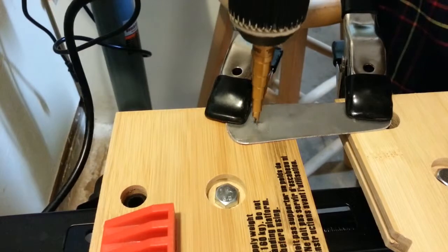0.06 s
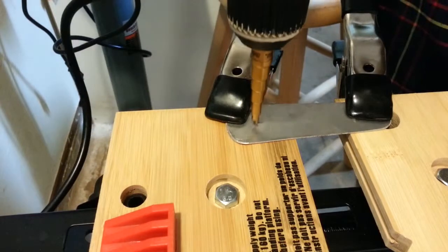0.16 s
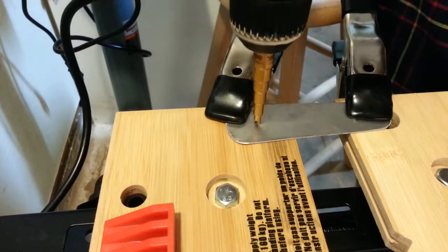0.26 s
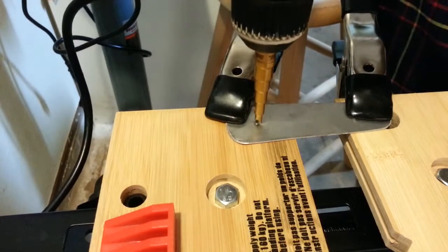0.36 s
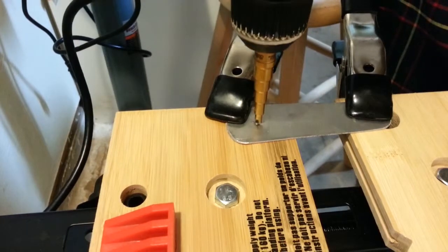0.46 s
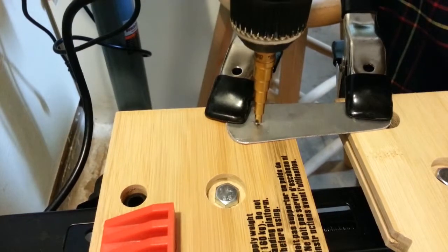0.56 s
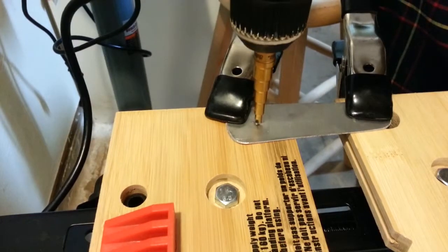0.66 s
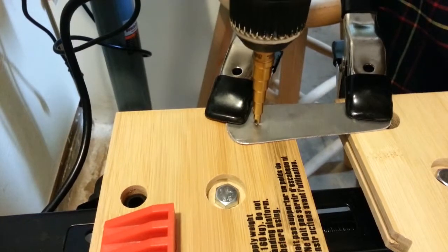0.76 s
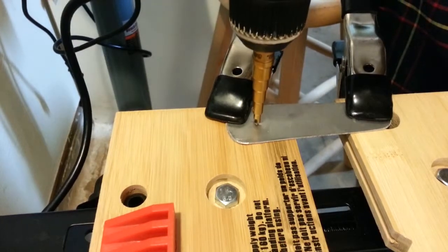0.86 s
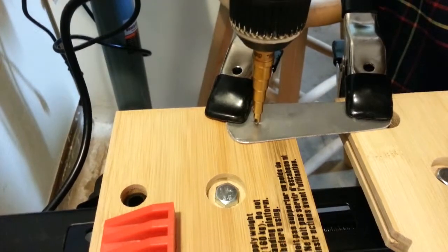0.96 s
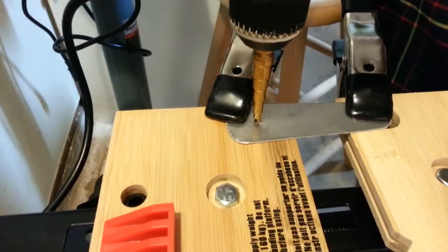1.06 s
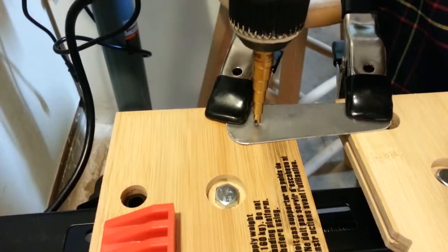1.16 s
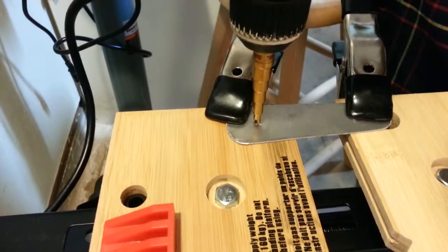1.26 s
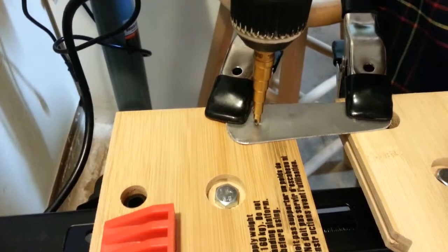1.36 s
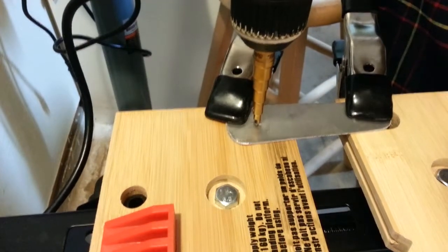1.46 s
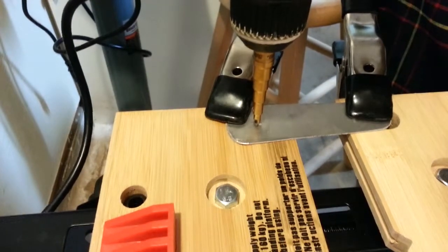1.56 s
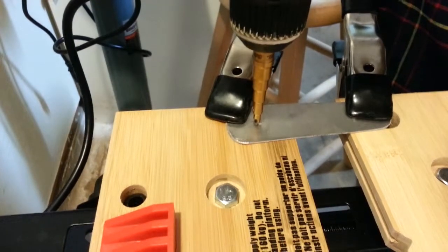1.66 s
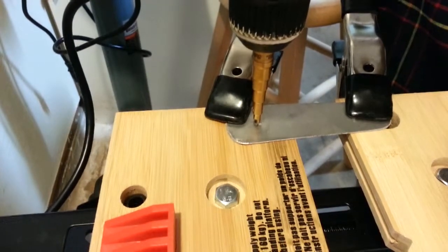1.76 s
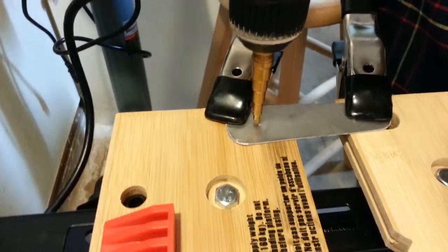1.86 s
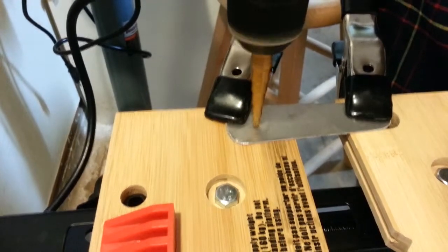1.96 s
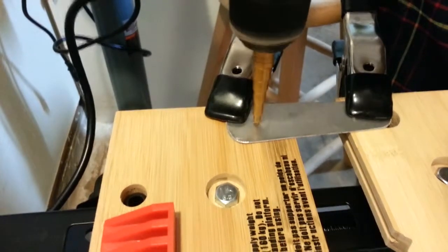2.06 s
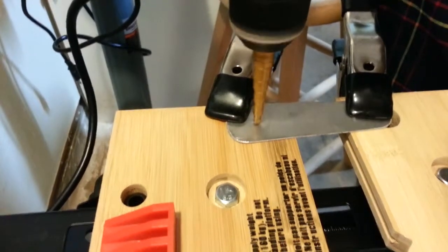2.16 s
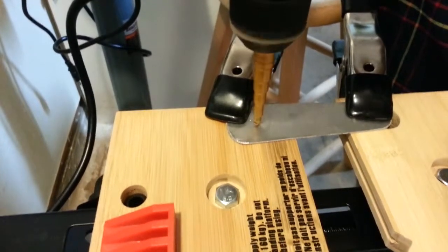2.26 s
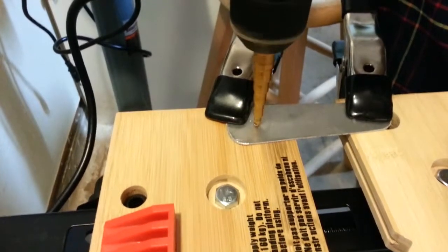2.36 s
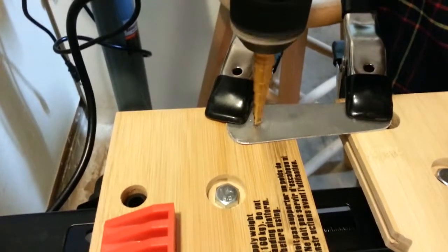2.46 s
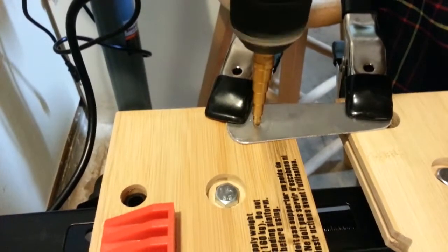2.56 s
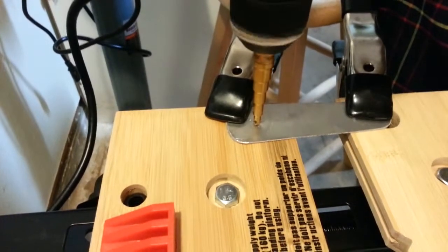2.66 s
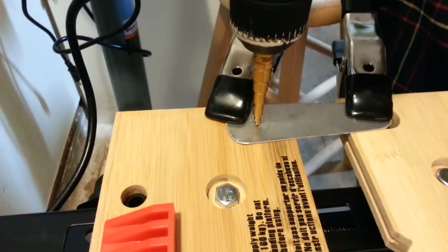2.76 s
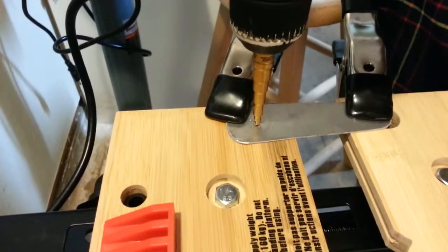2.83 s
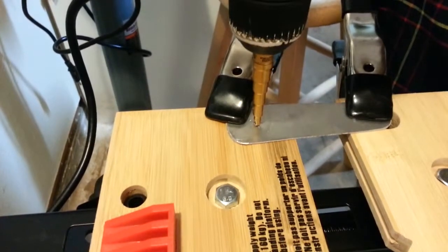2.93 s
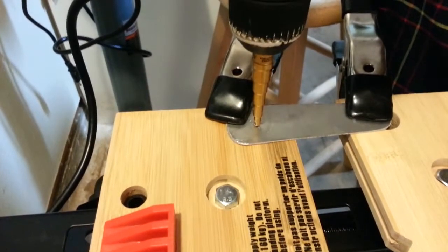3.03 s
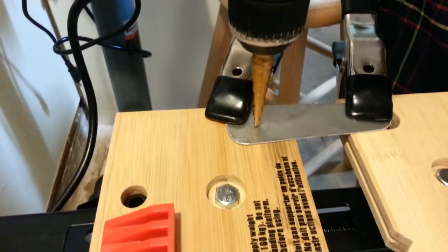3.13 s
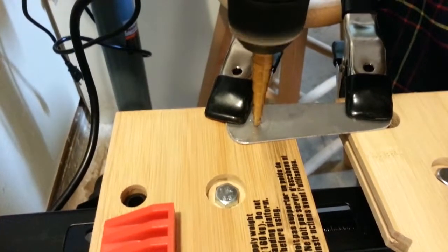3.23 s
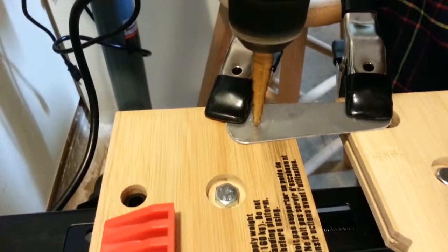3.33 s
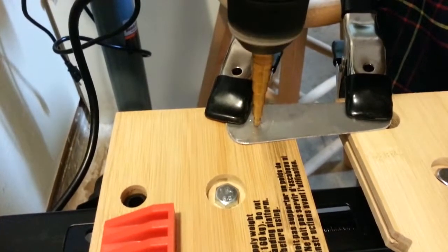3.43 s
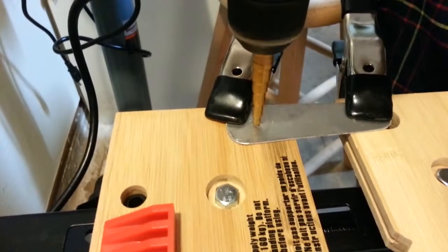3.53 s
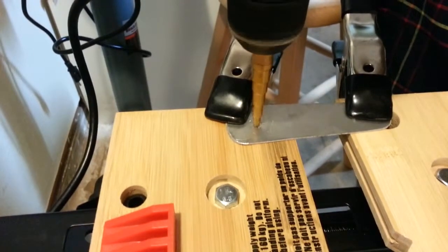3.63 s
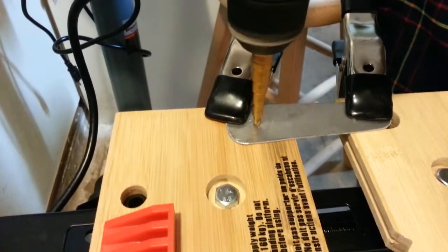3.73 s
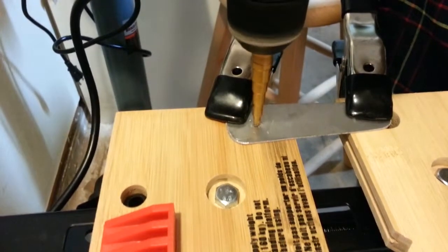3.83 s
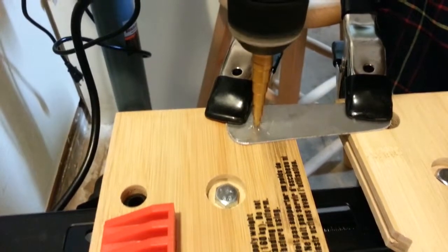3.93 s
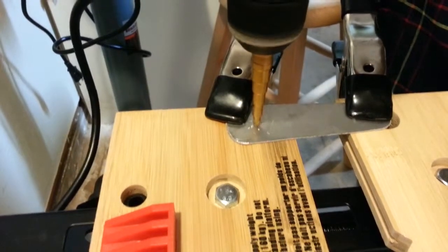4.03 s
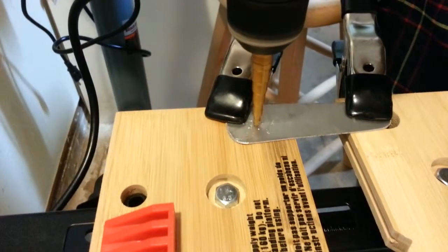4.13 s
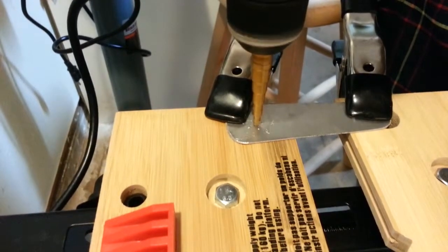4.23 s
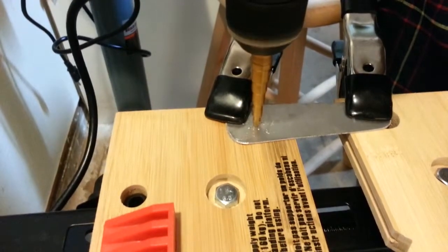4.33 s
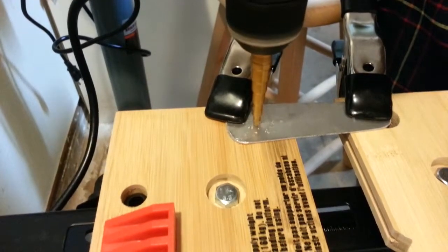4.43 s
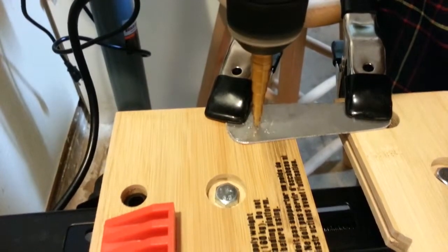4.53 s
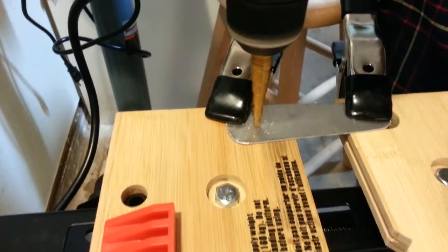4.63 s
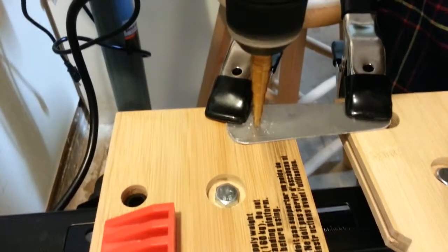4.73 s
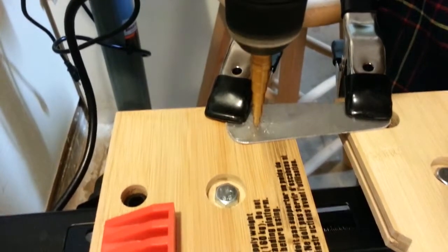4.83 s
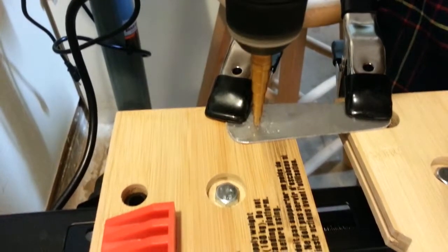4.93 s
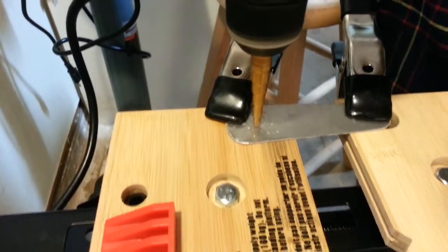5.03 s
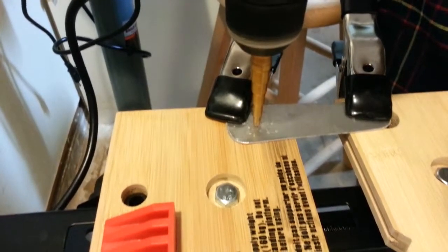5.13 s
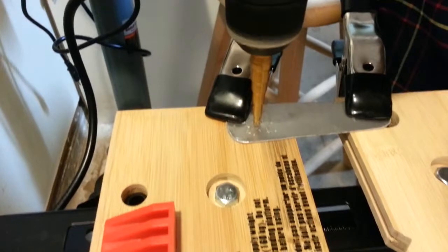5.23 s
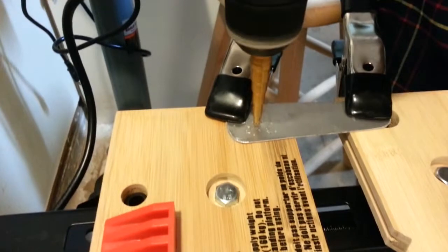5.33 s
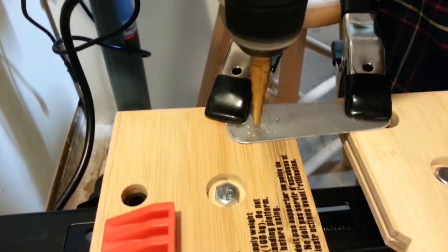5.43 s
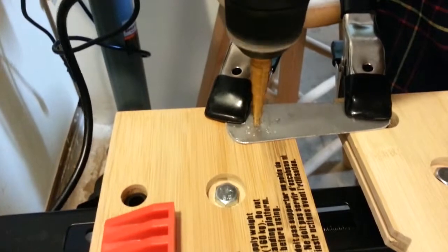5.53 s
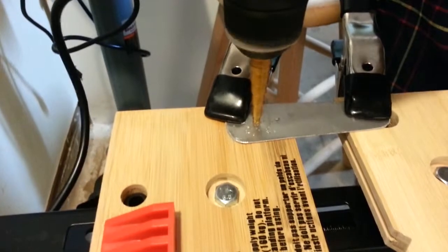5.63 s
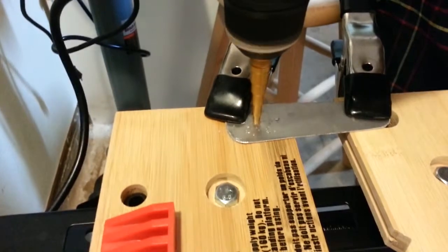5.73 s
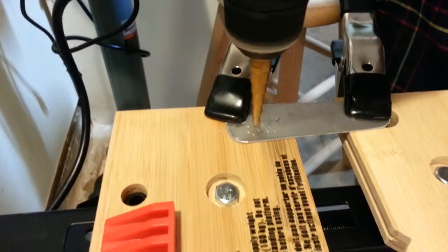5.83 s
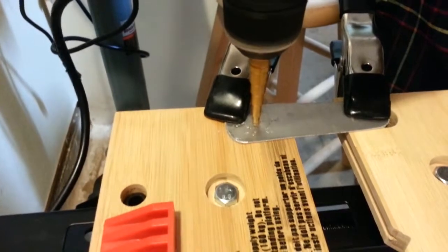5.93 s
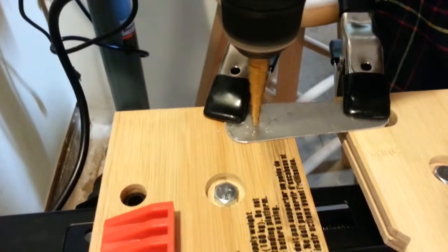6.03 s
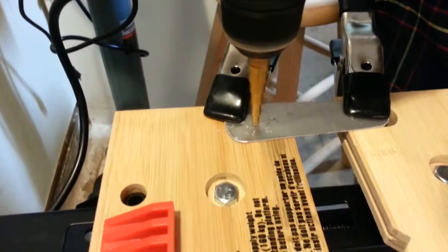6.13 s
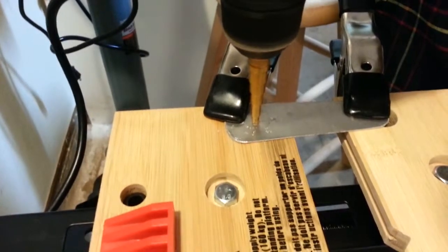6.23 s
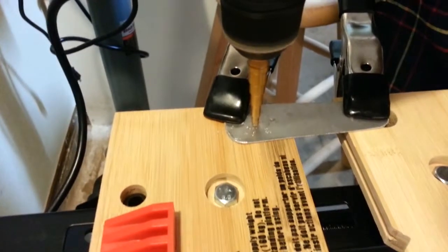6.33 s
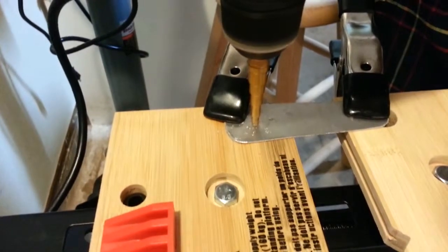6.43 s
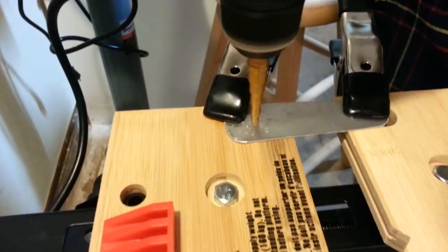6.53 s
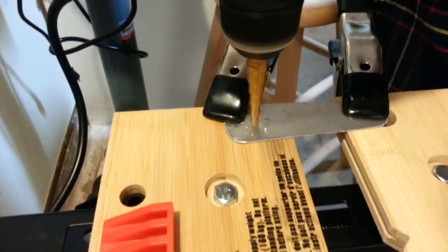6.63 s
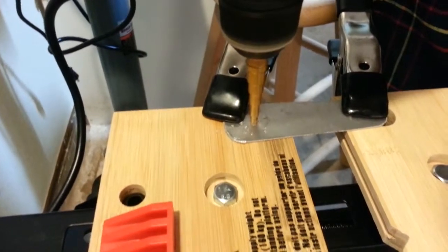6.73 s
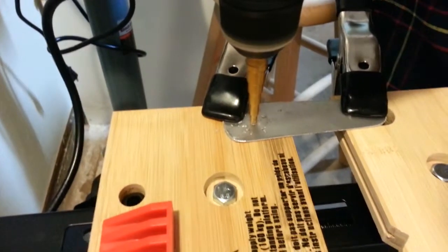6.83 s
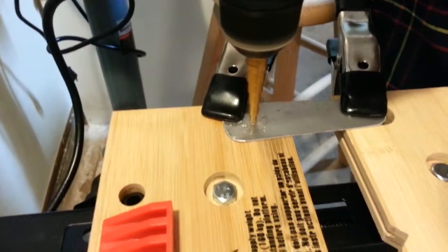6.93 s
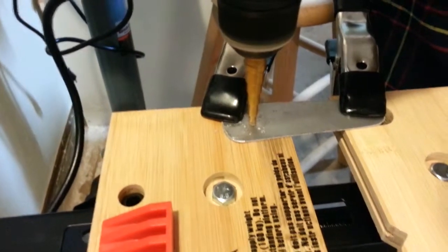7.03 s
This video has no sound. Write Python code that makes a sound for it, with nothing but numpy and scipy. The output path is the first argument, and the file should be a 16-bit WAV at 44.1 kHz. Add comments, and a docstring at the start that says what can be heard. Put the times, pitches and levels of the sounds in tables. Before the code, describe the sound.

For nearly two seconds there is only a low, soft room rumble and a faint hollow tone around 500 Hz that fades out, with tiny clicks at 0.5 and 1.4 and a clearer knock at 1.8. At 1.96 a mains drill on a clamped metal plate kicks in for a tenth of a second, with a rough gear grind and a buzzing, high squeal, then coasts down, whirring and ticking, to a stop by about 2.8. Soft rubs and knocks of the tool come around 2.9 to 3.2. Further short pulls start at 3.2, 3.8, 4.4, 4.9 and 5.8, each rising sharply and sagging before the next. A longer pull at 6.35 climbs highest, and another at 6.9 stays fast and loud to the end. Brush hiss, thin whistles and short room echo accompany it; low fan gusts buffet the right microphone.

```python
"""A drill grinds and squeals in short runs, each one winding up and then sinking as it coasts.
It is a mains drill with a step bit on a clamped metal plate; one shaft speed drives all its parts.
Gears and bit are noise shaped by the housing, brushes are ticks and hiss, the armature squeals in 120 Hz bursts.
Low, lumpy fan air buffets the right microphone port; knocks and rubs of the tool surround the runs.
Behind it lie a short room echo, a low rumble and a faint hollow tone that fades."""
import sys
import numpy as np
from scipy import signal
from scipy.fft import rfft, irfft, next_fast_len
from scipy.io import wavfile
from scipy.ndimage import uniform_filter1d, minimum_filter1d, map_coordinates

SR = 44100
rng = np.random.default_rng(int(sys.argv[2]) if len(sys.argv) > 2 else 0)


def unload_audio(sound):
    """Save the sound as a 16-bit wav file, at the path given as the first command line argument."""
    columns = np.transpose(np.atleast_2d(sound))
    # keep every value between -1 and 1, then stretch to whole-number steps
    steps = np.round(np.clip(columns, -1, 1) * 32767)
    wavfile.write(sys.argv[1], SR, steps.astype(np.int16))


N = 312669
SLOTS = 12  # armature slots, and as many commutator bars


def amp(db):
    """Decibels to gain."""
    return 10 ** (np.asarray(db) / 20)


def unit(x):
    """x at rms 1."""
    return x / np.sqrt(np.mean(x ** 2) + 1e-20)


def along(points, hz):
    """Read (frequency [Hz], value) points on a log frequency axis."""
    f, v = np.transpose(points)
    return np.interp(np.log(hz + 1), np.log(f + 1), v)


def curves(rows):
    """One value per sample for each column after the time."""
    times, *columns = np.transpose(rows)
    return [np.interp(np.arange(N) / SR, times, column) for column in columns]


def wobble(rate):
    """A smooth random curve, rate knots a second."""
    knots = rng.standard_normal(int(N * rate / SR) + 4)
    return map_coordinates(knots, [np.arange(N) * rate / SR])


def filtered(x, response):
    """x times a complex response of frequency."""
    m = next_fast_len(N + SR // 2)
    return irfft(rfft(x, m) * response(np.fft.rfftfreq(m, 1 / SR)), m)[..., :N]


def coloured(x, spectrum):
    """x through a (frequency [Hz], level [dB]) spectrum."""
    return filtered(x, lambda hz: amp(along(spectrum, hz)))


def ring(modes, hz):
    """Summed response of damped resonances, each a band-pass at its own centre."""
    return sum(amp(db) * 1j * hz * width / (centre ** 2 - hz ** 2 + 1j * hz * width)
               for centre, width, db in modes)


# Likeness of the two ports: (frequency [Hz], correlation [-1 to 1])
PORT_LIKENESS = [(200, 0.78), (1000, 0.78), (3000, 0.38), (5000, 0.067), (9000, 0.077), (14000, .2)]


def noise_pair():
    """White noise as a shared middle and an opposed side, so the ports are alike by set amounts."""
    def middle_and_side(hz):
        angle = np.arccos(np.clip(along(PORT_LIKENESS, hz), -1, 1)) / 2
        return np.array([np.cos(angle), np.sin(angle)])

    mid, side = filtered(rng.standard_normal((2, N)), middle_and_side)
    return np.array([mid + side, mid - side])


def pulses(phase, size):
    """A band-limited pulse wherever phase passes a whole number, placed between samples."""
    at = np.interp(np.arange(1, int(phase[-1])), phase, np.arange(N))
    taps = at.astype(int)[:, None] + np.arange(-7, 9)
    gap = taps - at[:, None]
    shape = np.sinc(gap) * np.cos(np.pi * gap / 16) ** 2
    heights = shape * size(len(at))[:, None]
    return np.bincount(np.clip(taps, 0, N - 1).ravel(), heights.ravel(), N)


def speed_gain(speed, level_db, knee, slope_db):
    """A part grows by slope_db per tenfold speed up to the knee [turns/s], then levels off."""
    share = (speed / knee) / (1 + (speed / knee) ** 6) ** (1 / 6)
    return amp(level_db + slope_db * np.log10(share + 1e-6))


# Pulls of the trigger: (press time [s], release time [s], shaft speed at release [turns/s])
TRIGGER_PULLS = [(1.959, 2.056, 220.4), (3.228, 3.307, 223.4), (3.838, 3.952, 296), (4.413, 4.55, 293.2),
                 (4.922, 5.082, 313.5), (5.831, 5.971, 305.8), (6.361, 6.665, 367), (6.912, 7.1, 365.4)]


def shaft():
    """Shaft speed [turns/s] and power: spin-up slows as it climbs, then friction and drag run it down."""
    surge = 0.043  # s after which the acceleration has halved
    friction, drag = 230, 0.52  # turns/s lost each second; rate of loss per unit of speed [1/s]
    t, speed, power = np.arange(N) / SR, np.zeros(N), np.zeros(N)
    for press, release, top in TRIGGER_PULLS:
        start = speed[round(press * SR)]
        held, after = (t >= press) & (t < release), t >= release
        rise = np.log1p((t[held] - press) / surge) / np.log1p((release - press) / surge)
        speed[held] = start + (top - start) * rise
        power[held] = 1
        coast = (top + friction / drag) * np.exp(-drag * (t[after] - release)) - friction / drag
        speed[after] = np.maximum(coast, 0)
    return speed, uniform_filter1d(power, size=300)


# Colour of the scraping, before the housing: (frequency [Hz], relative level [dB])
GRIND_SPECTRUM = [(40, -30), (130, -2), (260, -13), (450, -0.5), (800, -2.5), (1200, -3.5), (2200, -2.5),
                  (2900, -2), (3600, -6), (5200, -5.5), (6000, -15.5), (9000, -16), (15000, -37)]
# Resonances of the gear housing: (frequency [Hz], width [Hz], relative level [dB])
HOUSING_MODES = [(970, 150, 5.5), (1480, 150, 2), (1760, 150, 3), (3560, 300, -2), (4650, 400, -7)]


def grind(turns, rattle=0.083, grain_db=2):
    """Gear teeth and cutting edges scrape in step with the shaft and sound the housing."""
    once_a_turn = 1 + rattle * np.cos(2 * np.pi * turns)
    grain = amp(grain_db * wobble(500) + 0.9 * wobble(30))
    scrape = noise_pair() * once_a_turn * grain
    return unit(filtered(
        scrape, lambda hz: amp(along(GRIND_SPECTRUM, hz)) * (1 + ring(HOUSING_MODES, hz))))


# Magnetic pull on the slots: (frequency [Hz], relative level [dB])
PULL_SPECTRUM = [(500, -35), (2000, -28), (2600, -2.5), (3100, 1), (3600, 3.5), (4200, -11), (5200, 1.5),
                 (6300, -39), (12000, -28.5)]
# Ring of the stator: (frequency [Hz], width [Hz], relative level [dB])
STATOR_MODES = [(3020, 130, 3)]


def squeal(turns, speed, power, db=-23, ring_db=3, second_db=-5, flutter_db=2):
    """Under power the field tugs at the slots on every half wave of the mains and rings the stator."""
    mains_hz = 60
    t = np.arange(N) / SR
    current = power / (1 + (speed / 300) ** 6)  # back voltage cuts the current at speed
    bursts = 0.15 + 2.1 * np.abs(np.sin(2 * np.pi * mains_hz * t)) ** 3
    slot = 2 * np.pi * SLOTS * turns
    tug = np.sin(slot) + amp(second_db) * np.sin(2 * slot)
    tug *= 1 + 0.21 * np.cos(2 * np.pi * turns)
    flutter = amp(flutter_db * wobble(110))
    force = np.minimum(1, speed / 135) ** 3 * current * bursts * tug * flutter
    return amp(db) * filtered(
        force, lambda hz: amp(along(PULL_SPECTRUM, hz)) * (0.72 + amp(ring_db) * ring(STATOR_MODES, hz)))


# Colour of the brush ticks: (frequency [Hz], relative level [dB])
TICK_SPECTRUM = [(300, -30), (1500, -16), (2400, -6), (3200, 2), (4800, 2), (6100, -5), (7200, -2),
                 (10000, -8), (14500, -17)]


def brushes(turns, speed):
    """Brushes tick on every bar; bars out of true swell and sway the ticks once a turn."""
    uneven, sway = 0.3, 0.042  # share of the tick size; bars
    wear, rough = 0.2, 0.2  # scatter from bar to bar; from tick to tick
    bars = SLOTS * turns + sway * np.sin(2 * np.pi * turns)

    def size(count):
        once_a_turn = 1 + uneven * np.cos(2 * np.pi * np.arange(count) / SLOTS + np.pi / 2)
        worn = np.resize(wear * unit(rng.standard_normal(SLOTS)), count)
        return (once_a_turn + worn) * (1 + rough * rng.standard_normal(count))

    ticks = pulses(bars, size) / np.sqrt(speed + 20)  # evens out the power as ticks crowd together
    return unit(coloured(ticks, TICK_SPECTRUM))


# Colour of the brush hiss: (frequency [Hz], relative level [dB])
HISS_SPECTRUM = [(1500, -13.5), (3200, 1), (5000, 2), (6100, -2.5), (7300, -3), (9000, -7), (11000, -8),
                 (14000, -13.5)]
# Brush holders, rung by rubbing at a crawl: (frequency [Hz], width [Hz], relative level [dB])
HOLDER_MODES = [(3220, 630, 0)]


def commutator(turns, speed):
    """Ticks are clearest at middling speed; a crawl rubs the holders and full speed blurs into hiss."""
    clear = 0.82 / (1 + (speed / 178) ** 4) * np.minimum(1, speed / 55) ** 2
    hiss = unit(coloured(noise_pair() * amp(0.5 * wobble(760)), HISS_SPECTRUM))
    rubbing = unit(filtered(noise_pair(), lambda hz: ring(HOLDER_MODES, hz)))
    crawl = amp(15) / (1 + (speed / 56) ** 4)  # fades above 56 turns/s
    ticks = brushes(turns, speed)
    return amp(7.5) * np.sqrt(1 - clear) * hiss + amp(5.5) * np.sqrt(clear) * ticks + crawl * rubbing


# Whistles of slots and fan blades: (multiple of the shaft speed, relative level [dB])
WHISTLE_ORDERS = [(11, -6), (12, 0), (13, 2), (14, -10), (22, -4), (23, 1), (24, -2), (25, -2), (47, 0),
                  (48, 2), (49, 2), (50, -1), (72, 0), (73, 1)]
# The vents that let them out: (frequency [Hz], relative level [dB])
VENT_SPECTRUM = [(1500, -24), (2900, -10), (3600, -1), (4300, 1), (5100, 0), (5700, -12), (7000, -13),
                 (9000, -24), (13000, -40)]


def whine(turns, speed):
    """Slots and fan blades whistle on neighbouring orders, each wavering; they die away at low speed."""
    tone = np.zeros(N)
    for order, db in WHISTLE_ORDERS:
        phase = 2 * np.pi * order * turns + 0.35 * wobble(70)
        tone += amp(db + 2 * wobble(45)) * np.sin(phase)
    return amp(-35.5) * coloured(np.minimum(1, speed / 155) ** 3 * tone, VENT_SPECTRUM)


# Slow rise and fall in level of the grinding and brush noise:
# (time [s], grind offset [dB], brush offset [dB])
LEVEL_DRIFT = [(2.08, 2, 0), (2.25, -3, -3), (2.4, -1, 0), (2.56, -4.5, -1.5), (2.75, 1.5, -4.5),
               (3.3, 0, -2), (3.5, 1.5, 0.5), (3.66, -3, -1), (3.82, -0.5, -3), (3.95, 1, 0.5),
               (4.08, -0.5, -2.5), (4.4, 1, -1.5), (5.05, 0.5, -1), (5.4, 1, -1), (5.8, 1, -0.5),
               (6.25, 2, 0), (6.5, 1, -0.5), (7.0, 1.5, 1.5)]


def drill(speed, power):
    """All parts of the tool follow one shaft; power and the jolt of a start shift gears and brushes."""
    turns = np.cumsum(speed * (1 + 0.00207 * wobble(40))) / SR
    jolt = power * np.exp(-speed / 110)  # strongest when starting from rest
    skim = 11 * np.log2(np.maximum(1, speed / 215))  # brushes skim: dB lost above 215 turns/s
    grind_drift, brush_drift = curves(LEVEL_DRIFT)
    grind_db = grind_drift + 0.5 * power + 11 * jolt + 0.47 * wobble(15)
    brush_db = brush_drift + 3.5 * power - 4 * jolt - skim
    grind_gain = speed_gain(speed, level_db=-31, knee=241, slope_db=22.4) * amp(grind_db)
    brush_gain = speed_gain(speed, level_db=-40.5, knee=140, slope_db=26) * amp(brush_db)
    gears_and_bit = grind_gain * grind(turns)
    brush_noise = brush_gain * commutator(turns, speed)
    return gears_and_bit + brush_noise + squeal(turns, speed, power) + whine(turns, speed)


# Colour of the tumbling air: (frequency [Hz], relative level [dB])
EDDY_SPECTRUM = [(10, -64), (32, -49), (62, -14), (120, -6.5), (220, 1.5), (450, -1.5), (800, -9),
                 (1400, -18), (3000, -41)]
# Slow swells and lulls of the fan air: (time [s], level offset [dB])
AIR_GUSTS = [(2.15, -0.5), (2.45, -0.5), (3.25, -1.5), (3.5, 4), (3.66, -4), (4.05, -1), (4.35, -0.5),
             (4.55, 0.5), (4.85, -1), (4.97, -3), (5.2, 1.5), (5.5, -5.5), (5.62, -0.5), (6.0, -2.5),
             (6.3, -5.5), (6.5, 0.5), (6.9, -1.5), (7.08, 5.5)]
# Timed eddies at the right port: (time [s], relative level [dB])
TIMED_EDDIES = [(2.108, -22.5), (2.131, -32), (2.147, -24), (2.184, -28), (2.29, -28.5), (2.349, -28.5),
                (2.539, -46.5), (3.373, -35), (3.514, -27.5), (3.98, -25), (4.037, -19), (4.077, -29),
                (4.156, -22.5), (4.214, -28), (4.533, -26), (4.551, -19), (4.604, -25), (4.761, -24),
                (4.843, -29.5), (5.027, -22), (5.118, -22), (5.167, -22), (5.232, -24), (5.322, -24),
                (5.486, -21), (5.971, -25), (6.026, -25.5), (6.542, -29.5), (6.589, -22), (6.697, -24.5),
                (6.948, -23.5), (7.031, -31), (7.059, -23.5)]


def draft(speed, width=0.0033, puff_db=5, flow_db=3, leak_db=-19, gust_db=0.5):
    """Fan air tumbles over the right port as a lumpy flow with single eddies; the left gets a weak swirl."""
    air_lag = 0.049  # s for the air to reach the port
    eddy_rate, eddy_db, scatter_db = 11, 7.5, 1.5  # eddies at random times: per second, dB over flow, +/- dB
    t = np.arange(N) / SR
    late_speed = np.interp(t - air_lag, t, speed)
    gusts = amp(curves(AIR_GUSTS)[0] + gust_db * wobble(10))
    flow = speed_gain(late_speed, level_db=-34.5, knee=173, slope_db=95) * gusts

    def swirl():
        lumps = amp(3.9 * wobble(90))
        return flow * unit(coloured(rng.standard_normal(N), EDDY_SPECTRUM) * lumps)

    left, right = amp(leak_db) * swirl(), amp(flow_db) * swirl()
    eddies, air = np.zeros(N), coloured(rng.standard_normal(N), EDDY_SPECTRUM)
    chance = rng.uniform([0, -1], [t[-1], 1], (int(eddy_rate * N / SR), 2))
    at_random = [(s, np.interp(s, t, flow) * amp(eddy_db + scatter_db * size)) for s, size in chance]
    timed = [(s, amp(db)) for s, db in TIMED_EDDIES]
    for s, gain in timed + at_random:  # each eddy is one brief swell of the air
        n = np.clip(round(s * SR) + np.arange(-SR // 50, SR // 50), 0, N - 1)
        window = np.exp(-np.abs((n / SR - s) / width) ** 1.18 / 2)
        puff = air[n] * window
        eddies[n] += gain * puff * np.sqrt(np.sum(window ** 2) / np.sum(puff ** 2))
    return np.array([left, right + amp(puff_db) * eddies])


# Resonances of the tool's casing: (frequency [Hz], width [Hz], relative level [dB])
CASING_MODES = [(556, 120, 8.5), (930, 220, 2.5), (1540, 330, 5), (2090, 220, -2.5), (2660, 230, -30),
                (3890, 360, -32), (5200, 600, -42), (8500, 3700, -41.5)]
# Light knocks of tool and trigger:
# (time [s], relative level [dB], centre frequency [Hz], casing share [dB])
TOOL_KNOCKS = [(0.467, -46.5, 2140, -19), (0.594, -58, 1230, -19), (1.407, -57, 990, -42),
               (1.669, -60, 2000, -11), (1.812, -37.5, 2070, -7.5), (3.097, -50, 2310, -2),
               (3.103, -40, 1880, 5), (3.205, -48, 2400, -12), (3.223, -43, 4130, -15)]


def clicks(t60=0.032, db=-18, spread=0.16):
    """Short decaying bursts of contact noise, each around its own pitch, ring the casing."""
    out, t = np.zeros((2, N + SR)), np.arange(SR // 10) / SR
    hz = np.fft.rfftfreq(len(t), 1 / SR)
    for s, level_db, centre, casing_db in TOOL_KNOCKS:
        body = ring([(centre, spread * centre, -3)], hz) + amp(casing_db) * ring(CASING_MODES, hz)
        shared, apart = rng.standard_normal(len(t)), rng.standard_normal((2, len(t)))
        contact = (shared + 0.22 * apart) * amp(-60 * t / t60)
        knock = irfft(rfft(contact) * body)
        out[:, round(s * SR):][:, :len(t)] += amp(level_db + db) * unit(knock)
    return out[:, :N]


# The grip shifts and rubs on the casing: (middle time [s], length [s], level [dB])
GRIP_RUBS = [(1.906, 0.15, -68), (2.936, 0.16, -67.5), (3.16, .12, -69.5)]


def rubs(grain_db=2):
    """Soft swells of grainy friction noise sound the casing."""
    t = np.arange(N) / SR
    stroke = sum(amp(db) * np.exp(-(2 * (t - s) / length) ** 2 / 2) for s, length, db in GRIP_RUBS)
    friction = noise_pair() * amp(grain_db * wobble(87))
    return stroke * unit(filtered(friction, lambda hz: ring(CASING_MODES, hz)))


# Decay of the room: (frequency [Hz], time to fall 60 dB [s])
WALL_DECAY = [(200, 0.29), (2000, 0.29), (10000, 0.2)]


def walls(x):
    """The small room answers with a decaying noise tail, its treble dying first."""
    hz, t, z = signal.stft(rng.standard_normal((2, SR // 3)), SR, nperseg=256)
    decay = amp(-60 * t / along(WALL_DECAY, hz)[:, None])
    tail = signal.istft(z * decay, SR, nperseg=256)[1]
    delayed = np.pad(x, ((0, 0), (150, 0)))  # samples before the first echo
    return signal.fftconvolve(delayed, tail / np.linalg.norm(tail[0]), axes=1)[:, :N]


# Colour of the room rumble: (frequency [Hz], relative level [dB])
RUMBLE_SPECTRUM = [(25, -29), (55, -8.5), (90, -3), (190, -4), (238, 3), (290, -7), (500, -9), (800, -14.5),
                   (1200, -17.5), (3000, -23.5), (15000, -29.5)]
# Colour of the hollow tone: (frequency [Hz], relative level [dB])
HOLLOW_SPECTRUM = [(300, -42), (470, -11), (525, 3.5), (575, -8), (660, -13), (1000, -22), (1400, -22),
                   (4000, -39)]
# Fading of the hollow tone: (time [s], level [dB])
HOLLOW_FADE = [(0, -65), (0.28, -73.5), (0.4, -66), (0.74, -76.5), (0.85, -75), (1.06, -76), (1.12, -87),
               (1.75, -96)]


def room_tone():
    """Low filtered noise rumbles under a faint narrow band of noise, a hollow tone that fades."""
    shared, apart = rng.standard_normal(N), rng.standard_normal((2, N))
    rumble = unit(coloured(shared + 1.7 * apart, RUMBLE_SPECTRUM))
    hollow = unit(coloured(noise_pair(), HOLLOW_SPECTRUM))
    return amp(-68) * rumble + amp(curves(HOLLOW_FADE)[0] + 2.4 * wobble(13)) * hollow


# Tone of the two ports: (frequency [Hz], left minus right [dB])
PORT_TILT = [(150, -2.5), (400, 1), (1000, -0.5), (1250, 2), (1600, 4), (2100, -2), (3500, 1.5),
             (5200, -0.5), (6000, -1.5), (8000, 0), (10500, 6), (14000, 8.5)]
# Phase by which the left port leads: (frequency [Hz], phase [rad])
PORT_LEAD = [(200, 0.71), (1000, 0.023), (2000, 0.94), (3000, 1.57), (5000, 2.04), (14000, 1.64)]


def scene():
    """Tool and echo reach the left port a little earlier, coloured by each port; air and room join."""
    speed, power = shaft()
    tool = drill(speed, power) + clicks() + rubs()
    sides = np.array([[0.5], [-0.5]])  # half of each difference goes to either port

    def ports(hz):
        return amp(sides * along(PORT_TILT, hz)) * np.exp(1j * sides * along(PORT_LEAD, hz))

    return filtered(tool + amp(-10.5) * walls(tool), ports) + draft(speed) + room_tone()


def record(dry):
    """A fast limiter holds the peaks of each port, then a steep low-pass removes the top treble."""
    ceiling, top_hz = 0.225, 14700  # limiter ceiling before the low-pass; band limit
    needed = np.minimum(1, ceiling / (np.abs(dry) + 1e-9))
    gain = uniform_filter1d(minimum_filter1d(needed, size=90, axis=1), size=90, axis=1)
    return filtered(dry * gain, lambda hz: hz < top_hz)


dry = scene()
out = record(dry)
unload_audio(out)
```